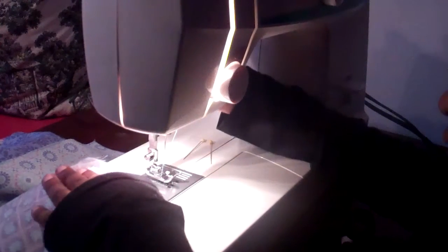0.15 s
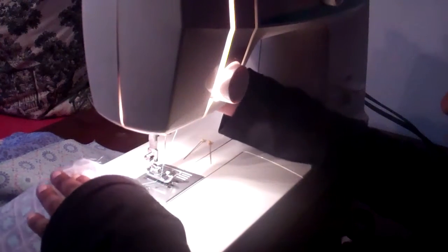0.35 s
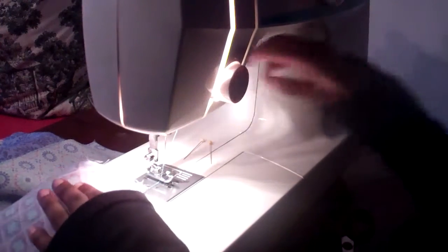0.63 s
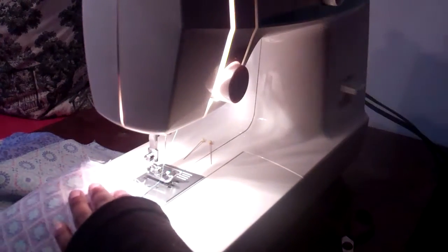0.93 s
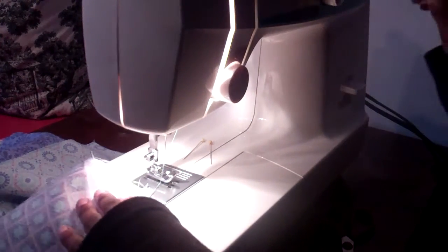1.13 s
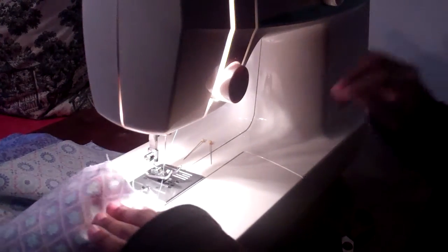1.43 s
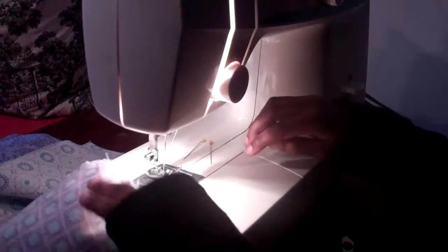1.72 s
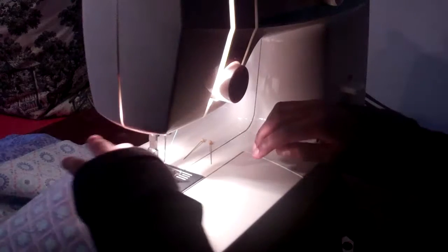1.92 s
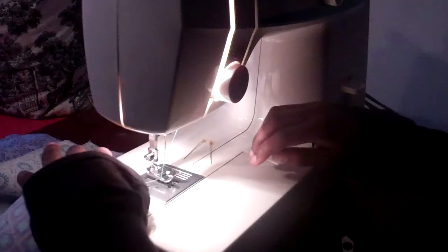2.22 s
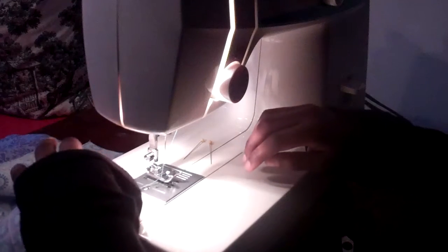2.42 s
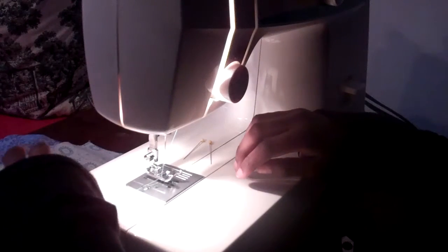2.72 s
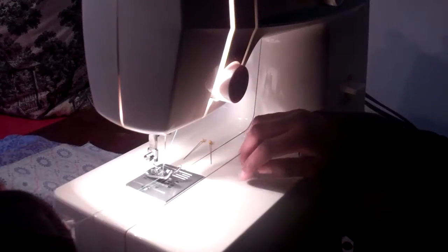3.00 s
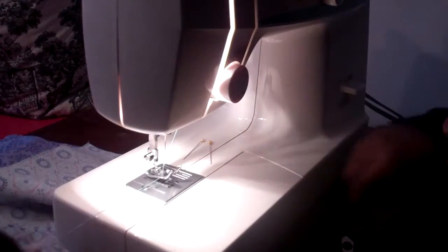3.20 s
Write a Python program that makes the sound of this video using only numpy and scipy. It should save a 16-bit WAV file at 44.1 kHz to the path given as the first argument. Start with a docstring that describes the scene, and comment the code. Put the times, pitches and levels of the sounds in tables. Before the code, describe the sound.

A sewing machine's foot lever snaps, then light plastic and metal taps and soft fabric rustle.

```python
"""Knocks and snaps from a stopped sewing machine, worked by hand on a table close to a stereo microphone.
The foot lever snaps, and fingers and thread knock the plastic case and its metal parts. Each blow makes
them ring at their own pitches (modes), and the room answers. Cloth drags over the machine's bed with
a grainy rub and a rustle. Behind it all, two thin steady tones stand in the hiss of a quiet room."""
import sys
import numpy as np
from scipy import signal
from scipy.fft import rfft, irfft
from scipy.io import wavfile
from scipy.ndimage import uniform_filter1d

SR = 44100
rng = np.random.default_rng(int(sys.argv[2]) if len(sys.argv) > 2 else 0)


def inscribe(sig):
    """Save sig as 16-bit PCM at rate SR to the path in sys.argv[1].

    A 1-D sig is mono; a 2-D sig holds one channel per row.
    Samples are clipped to [-1, 1] before scaling.
    """
    pcm = np.round(np.clip(np.atleast_2d(sig).T, -1, 1) * 32767)
    wavfile.write(sys.argv[1], SR, pcm.astype(np.int16))


N = 147735

# Edges of eight bands, from bass to treble: f/Hz
BAND_EDGES = [130, 290, 480, 850, 1500, 2800, 5500, 9000, 14500]
# One blow a row: t/s, level/dB, eight band levels/dB added to that level, rattle length/s,
# case f/Hz and metal f/Hz (modes near these two pitches ring most)
BLOWS = [(0.0085, -32, -33, -21, -23, -48, -19.5, -36, -10, -12, 0.0094, 730, 7250),
         (0.05, -6, -35, -21.5, -20, -23.5, -19.5, -15.5, -17.5, -23, 0.0022, 676, 4340),
         (0.065, -17.5, -31, -12.5, -10, -16.5, -24, -27, -25, -38, 0.0045, 576, 1890),
         (0.126, -26.5, -30, -26, -11, -14.5, -16.5, -17, -45, -30, 0.015, 616, 1670),
         (0.467, -42.5, -6, -18.5, -17, -18, -22, -16.5, -20, -22, 0.0023, 189, 3300),
         (0.546, -40, -22, -17.5, -15.5, -11, -14.5, -17, -16, -15, 0.0017, 1330, 1990),
         (0.633, -23, -13.5, -10, -11.5, -25, -26, -33, -40, -35, 0.013, 392, 302),
         (1.003, -48.5, -20, -21, -17, -11, -19, -24, -30, -30, 0.008, 600, 1320),
         (1.157, -46, -35, -26, -22, -14.5, -11, -17, -26, -30, 0.0033, 1240, 1620),
         (1.429, -23.5, -38, -26, -16.5, -22.5, -16, -23, -34, -33, 0.0063, 706, 2000),
         (1.95, -36, -35, -42, -8.5, 0.5, -5.5, -11, -25, -18, 0.00091, 1060, 1810),
         (1.962, -26.5, -40, -23.5, -11, -18, -11.5, -11.5, -11.5, -20, 0.0054, 740, 1945),
         (1.992, -31, -34, -31, -12.5, -21, -13.5, -15.5, -15.5, -25, 0.005, 727, 2000),
         (2.275, -30, -52, -46, -14.5, -4.5, -8.5, -13.5, -35, -22, 0.003, 1090, 1700),
         (2.285, -30, -44, -42, -20, -13, -11.5, -18, -41, -23, 0.012, 985, 1660),
         (2.493, -25.5, -35, -27, -17.5, -17.5, -13.5, -12, -32, -27, 0.0073, 545, 3995),
         (2.708, -41, -36, -21, -9, -30, -14.5, -20, -24, -20, 0.0034, 720, 2050),
         (2.812, -25, -37, -27.5, -9.5, -18.5, -17, -14, -23.5, -36, 0.0029, 730, 2930),
         (2.929, -40.5, -36, -32, -12, -16, -16, -17.5, -21, -14.5, 0.0073, 550, 1790),
         (3.103, -40, -25, -35, -13, -24, -18, -15, -23, -10, 0.017, 710, 2670),
         (3.202, -36, -34, -29, -15, -28, -28, -18.5, -25, -13.5, 0.019, 335, 2400),
         (3.287, -27.5, -31.5, -29, -12, -18.5, -19, -15, -31, -31, 0.0033, 521, 3620),
         (3.3, -32.5, -20.5, -18.5, -24, -10, -34, -39, -33, -38, 0.0033, 970, 2130)]
# Modes of the case and table: f/Hz, level/dB, fade time/s (the time to fall by 60 dB)
CASE_MODES = [(193, -16.5, 0.15), (272.3, -3, 0.14), (327.5, -2, 0.27), (385.2, 2, 0.21),
              (432.5, -3.5, 0.36), (504, 2.5, 0.1), (558.6, 0.5, 0.26), (615, -2, 0.19), (723, 0.5, 0.088),
              (781, -4, 0.13), (915, -8, 0.16), (993.4, 0.5, 0.12), (1041, 9.5, 0.02), (1259, 5.5, 0.07),
              (1348, -6.5, 0.21)]
# Modes of the metal foot, plate and levers: f/Hz, level/dB, fade time/s
METAL_MODES = [(1613, 8, 0.056), (1690, -14, 0.02), (1868, 6.5, 0.036), (1965, 4.5, 0.067),
               (2161, 9.5, 0.049), (2845, -0.5, 0.079), (2885, -1, 0.039), (3137, 5, 0.032),
               (3860, -2, 0.048), (4150, -6, 0.063), (4640, -12, 0.04), (4670, -20, 0.031),
               (6500, -22, 0.025), (7960, -36, 0.015)]
# The crack (a blow's unpitched part) against the modes, by band: level/dB
CRACK_LEVELS = [-44, -7.5, -4, -4.5, 11.5, 0, 13, 34]
# How long the crack lasts, by band: fade time/s
CRACK_FADES = [0.21, 0.13, 0.11, 0.1, 0.055, 0.039, 0.023, 0.022]
# The crack's side (added on the left, taken away on the right), by band: level/dB
CRACK_WIDTHS = [-28, -21, -19, -15, -12, -7, -6, -3.5]
# The room's echo against the blow, by band: level/dB
ECHO_LEVELS = [-3, -3, -8.5, -9.5, -12, -16, -12, -10]
# How long the echo lasts, by band: fade time/s
ECHO_FADES = [0.31, 0.35, 0.47, 0.42, 0.41, 0.4, 0.22, 0.11]
# The levels of the rub and rustle over time: t/s, rub level/dB, rustle level/dB (the first two rows hold a low
# rumble dying away at the very start)
RUB_LEVELS = [(0.0,-50.5,-50.5), (0.05,-49,-50.5), (0.3,-61,-56.5), (0.8,-65.5,-57.5), (1.2,-66,-57.5),
              (1.4,-57,-54.5), (1.68,-67.5,-58.5), (2.3,-63.5,-58), (2.42,-51.5,-54.5), (2.62,-50,-56.5),
              (2.9,-48,-54), (3.03,-52.5,-57), (3.09,-51.5,-50), (3.17,-48.5,-52), (3.23,-45,-50),
              (3.28,-46,-52.5), (3.35,-70,-60)]
# Tone colour of the rub: f/Hz, level/dB
RUB_COLOUR = [(88, -35), (150, -7.5), (530, 2.5), (651, -3), (721, 1.5), (835, 0), (1300, 1), (1420, 1),
              (5000, -24.5), (6500, -52), (11000, -120)]
# Tone colour of the hiss that both ears share: f/Hz, level/dB
HISS_COLOUR = [(25, -11), (60, -9.5), (130, -8), (300, -7.5), (600, -10), (1200, -13.5), (3000, -19.5),
               (7000, -21.5), (9000, -16.5), (10500, -24.5), (12500, -13), (14200, -9.5)]
# The hiss's side against that shared part: f/Hz, level/dB
HISS_WIDTH = [(60, -9), (110, -4.5), (200, -1.5), (380, -2), (700, -3), (1290, 1), (2380, 2), (4400, 4.5),
              (8120, 6), (15000, 1)]
# The two thin tones: f/Hz, average level/dB
THIN_TONES = [(1529, -65), (11806, -64.5)]

SIDE = np.array([[1], [-1]])  # plus on the left, minus on the right


def knocks():
    """A soft push wakes the case, a rattle of contacts wakes the metal and a crack; the room answers."""
    scatter_db, nearest_db, nearest_octaves = 2, 19, 0.12
    push_cycles, crisp_hz = 0.63, 4100  # above crisp_hz the crack is over sooner
    t = np.arange(SR // 2) / SR
    out = np.zeros((2, N + len(t)))
    head = int(.012 * SR)  # the first 12 ms set a blow's level
    mode_hz = np.array(CASE_MODES + METAL_MODES)[:, 0]
    for start_s, level_db, *band_db, rattle_s, case_hz, metal_hz in BLOWS:
        chance = rng.standard_normal((6, len(t)))
        rattle = chance[0] * undb(5.4 * chance[1]) * np.exp(-t / rattle_s)
        rattle[0] += np.abs(rattle).max()  # the first contact
        noise, nearness = chance[2:], 0
        for hz in (case_hz, metal_hz):  # both modes and noise are stronger near these pitches
            nearness += np.exp(-(np.log2(mode_hz / hz) / nearest_octaves) ** 2)
            noise = noise + 2.37 * signal.lfilter(*signal.iirpeak(hz, Q=7, fs=SR), noise)
        ringing = machine_ring(t, scatter_db * chance[1, -len(mode_hz):] + nearest_db * nearness)
        metal = signal.fftconvolve(rattle, ringing)[:len(t)]
        start = int(start_s * SR)
        for k, low_hz in enumerate(BAND_EDGES[:-1]):
            case = ringing * (1 - np.exp(-t * low_hz / push_cycles))
            modes = band(case if low_hz < METAL_MODES[0][0] / 2 else metal, k)
            crack_mid, crack_side = crack(t, noise[:2], k, rattle_s * min(1, crisp_hz / low_hz))
            mid = modes / np.abs(modes).max() + crack_mid
            direct = (mid + undb(CRACK_WIDTHS[k]) * crack_side * SIDE) / rms(mid[:head])
            echo = room_echo(t, noise[2:], k)
            out[:, start:start + len(t)] += undb(level_db + band_db[k]) * (direct + echo)
    return out[:, :N]


def machine_ring(t, boost_db):
    """After one blow every mode rings as a fading sine wave, woken more or less by its boost."""
    hz, db, fade_s = np.array(CASE_MODES + METAL_MODES).T[:, :, None]
    gain = undb(db + boost_db[:, None]) * (-1.) ** np.arange(len(hz))[:, None]  # signs alternate
    return np.sum(gain * np.sin(2 * np.pi * hz * t) * fade(t, fade_s), axis=0)


def crack(t, noise, k, rattle_s):
    """A blow's burst of noise in band k, drawn out by the rattle."""
    power = signal.lfilter([1], [1, -np.exp(-2 / SR / rattle_s)], fade(t, CRACK_FADES[k]) ** 2)
    burst = band(noise * np.sqrt(power), k)
    return undb(CRACK_LEVELS[k]) * burst / np.abs(burst[0]).max()


def room_echo(t, noise, k, rise_s=0.0036):
    """The room's answer in band k builds up fast and dies away, not quite alike in each ear."""
    tail = band(noise, k)
    mid, side = tail / tail.std() * fade(t, ECHO_FADES[k]) * (1 - np.exp(-t / rise_s))
    return undb(ECHO_LEVELS[k]) * (mid + undb(CRACK_WIDTHS[k] + 7) * side * SIDE)


def cloth_drag():
    """Cloth rubs the bed in uneven grains that stir the modes; its fibres rustle in the treble."""
    bed_hz, bed_boost_db = 725, 7.5  # picks out the case mode right under the cloth
    grain_db, ring_db, rub_side_db, rustle_hz = 3, 2, -17, 2460
    times, rub_db, rustle_db = np.array(RUB_LEVELS).T
    t = np.arange(N) / SR
    grains = rng.standard_normal((2, N)) * undb(grain_db * wander(150) + 1.4 * wander(42.72))
    under_cloth = np.abs(np.array(CASE_MODES + METAL_MODES)[:, 0] - bed_hz) < 20
    ringing = signal.fftconvolve(grains[0], machine_ring(t[:SR // 2], bed_boost_db * under_cloth))[:N]
    shape = lambda x: unit(colour(x, lambda hz: level_at(RUB_COLOUR, hz)))
    rub = unit(shape(grains[1]) + undb(ring_db) * shape(ringing)) * undb(np.interp(t, times, rub_db))
    fibres = rng.standard_normal((2, N)) * undb(1.74 * wander(700))
    rustle = colour(fibres, lambda hz: 20 * np.log10(np.minimum(hz / rustle_hz + .001, 1)))
    rustle = unit(rustle) * undb(np.interp(t, times, rustle_db))
    side = undb(rub_side_db) * np.roll(rub, SR // 50) + 0.58 * rustle[1]  # a late copy widens the rub
    return rub + rustle[0] + side * SIDE


def thin_tones(pitch_drift=0.0003, waver_db=1.5):
    """Two faint sine tones waver a little in pitch and loudness."""
    out = np.zeros(N)
    for hz, db in THIN_TONES:
        cycles = np.cumsum(hz * (1 + pitch_drift * wander(6.2))) / SR
        out += np.sqrt(2) * undb(db + waver_db * wander(30.14)) * np.sin(2 * np.pi * cycles)
    return out


def hiss(level_db=-54.5):
    """The room and the microphone add a steady noise."""
    mid = colour(rng.standard_normal(N), lambda hz: level_at(HISS_COLOUR, hz))
    side = colour(rng.standard_normal(N), lambda hz: level_at(HISS_COLOUR, hz) + level_at(HISS_WIDTH, hz))
    return (mid + side * SIDE) * undb(level_db) / mid.std()


def undb(db):
    """Turn decibels into a number to multiply by."""
    return 10 ** (np.asarray(db) / 20)


def rms(x):
    """The average strength of a sound."""
    return np.sqrt(np.mean(x ** 2))


def unit(x):
    """Bring a sound to an average strength of 1."""
    return x / rms(x)


def level_at(table, hz):
    """Read a level between the rows of an f/Hz, level/dB table."""
    table_hz, db = np.array(table).T
    return np.interp(np.log(hz + 1), np.log(table_hz), db)


def colour(x, db_of):
    """Turn each frequency of a noise up or down."""
    return irfft(rfft(x) * undb(db_of(np.fft.rfftfreq(N, 1 / SR))), N)


def band(x, k):
    """Keep only the frequencies in band k."""
    return signal.sosfilt(signal.butter(3, BAND_EDGES[k:k + 2], "band", fs=SR, output="sos"), x)


def fade(t, fade_s):
    """Fall by 60 dB in fade_s seconds."""
    return np.exp(-np.log(1000) * t / fade_s)


def wander(rate_hz):
    """A smooth random curve of strength 1 that heads for a new value rate_hz times a second."""
    hold = int(SR / rate_hz)
    steps = np.repeat(rng.standard_normal(N // hold + 1), hold)
    return unit(uniform_filter1d(uniform_filter1d(steps, hold), hold)[:N])


def scene(left_minus_right_db=-0.7):
    """Add all the sounds, leaning slightly to the right."""
    return (knocks() + cloth_drag() + hiss() + thin_tones()) * undb(SIDE * left_minus_right_db / 2)


def record(dry, top_hz=14300):
    """Cut away the highest treble."""
    return signal.sosfilt(signal.ellip(12, .3, 80, top_hz, fs=SR, output="sos"), dry)


dry = scene()
out = record(dry)
inscribe(out)
```